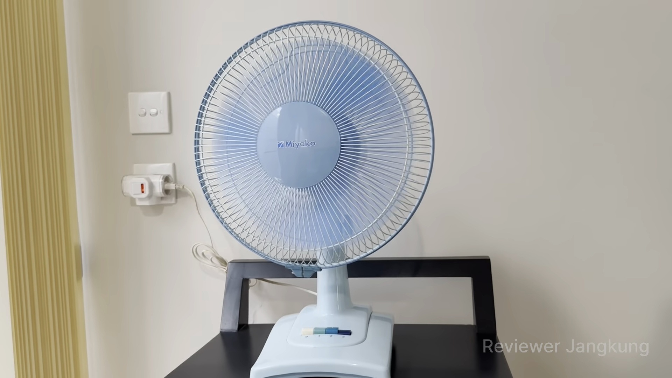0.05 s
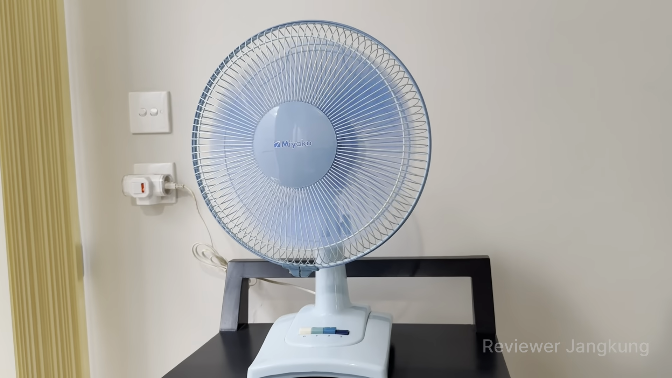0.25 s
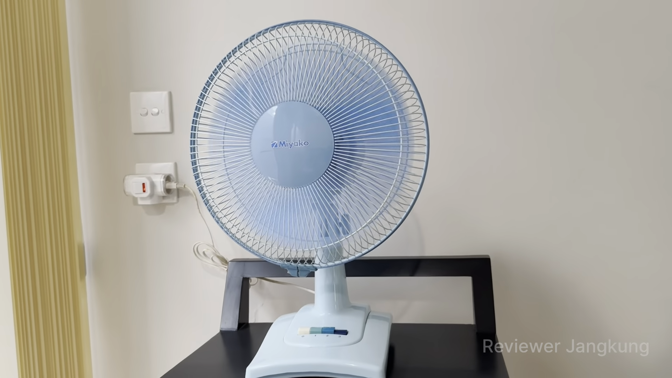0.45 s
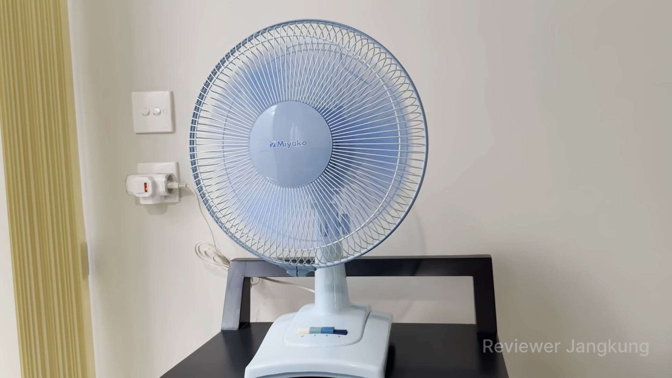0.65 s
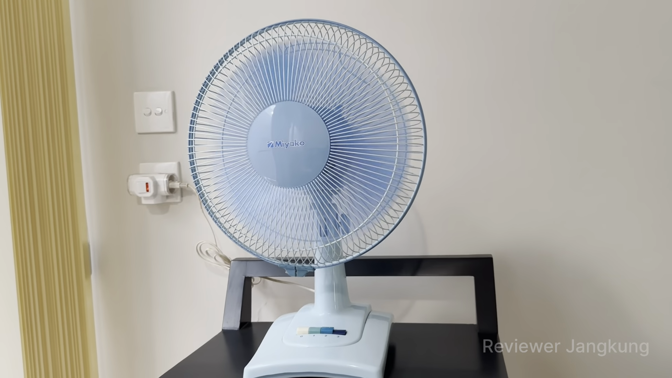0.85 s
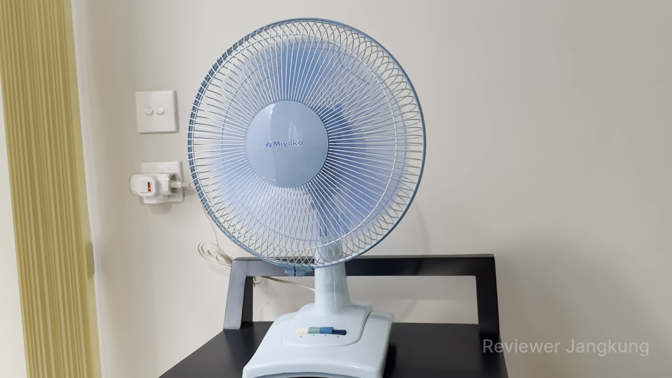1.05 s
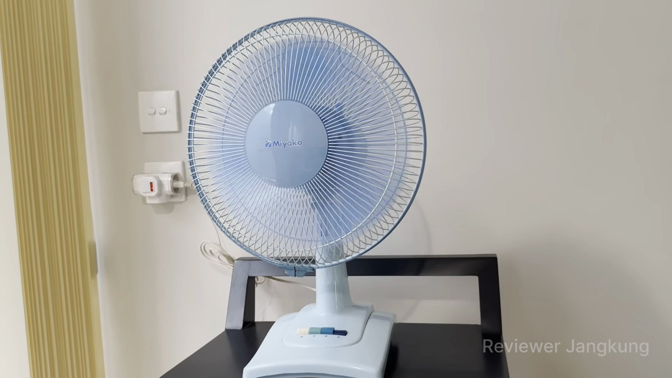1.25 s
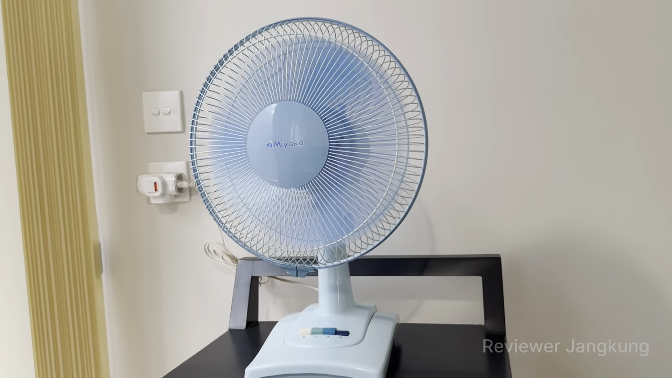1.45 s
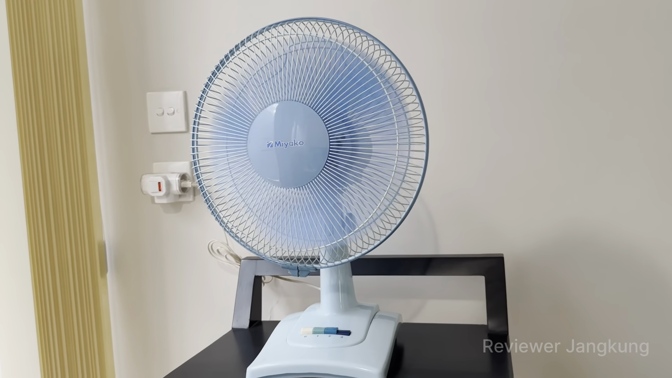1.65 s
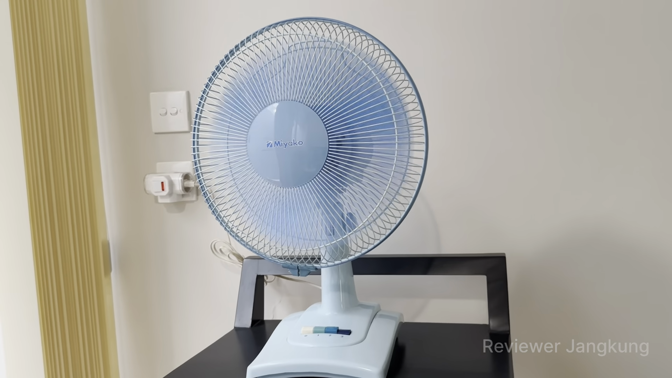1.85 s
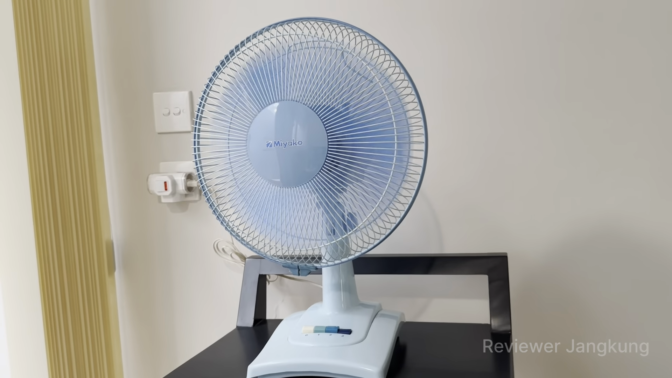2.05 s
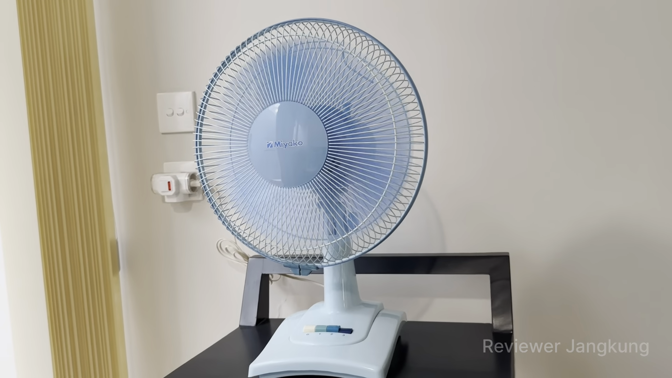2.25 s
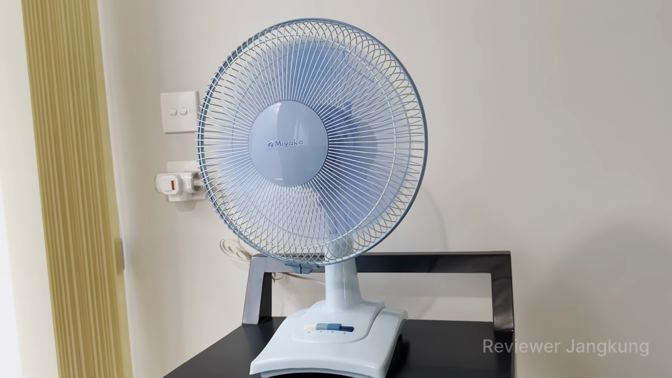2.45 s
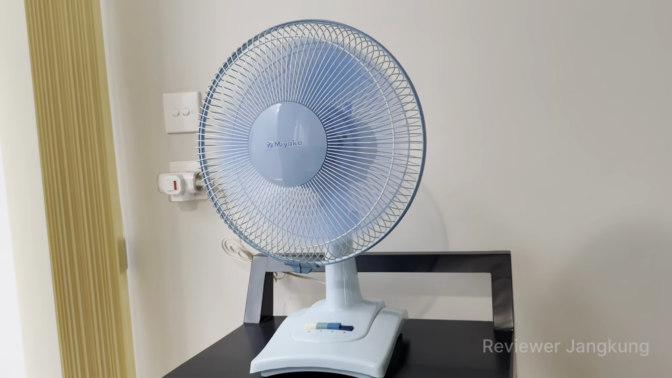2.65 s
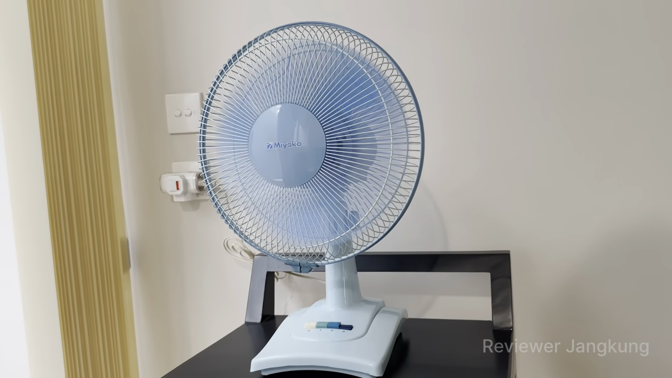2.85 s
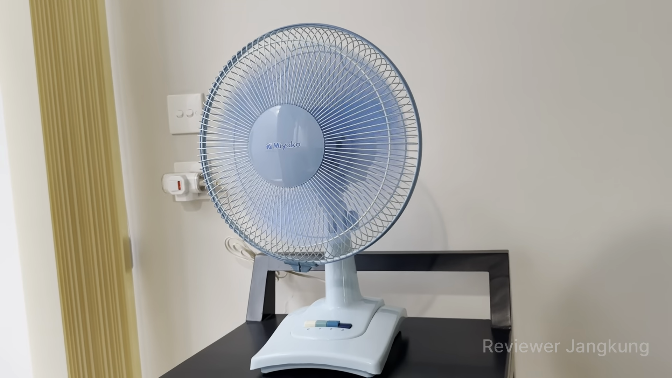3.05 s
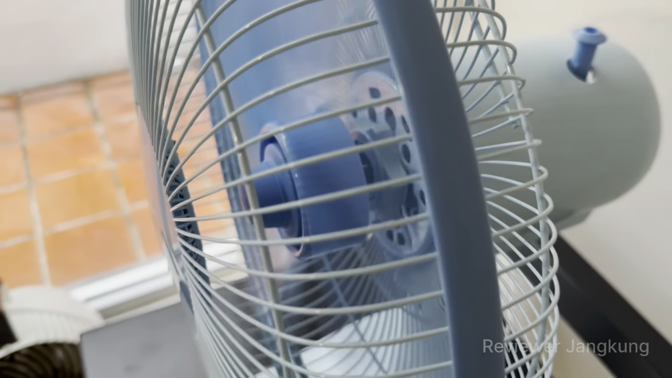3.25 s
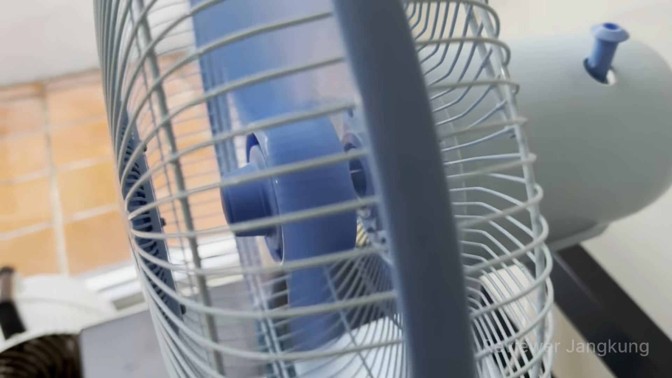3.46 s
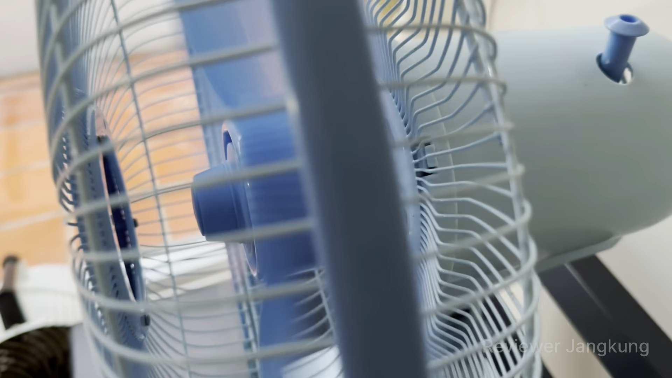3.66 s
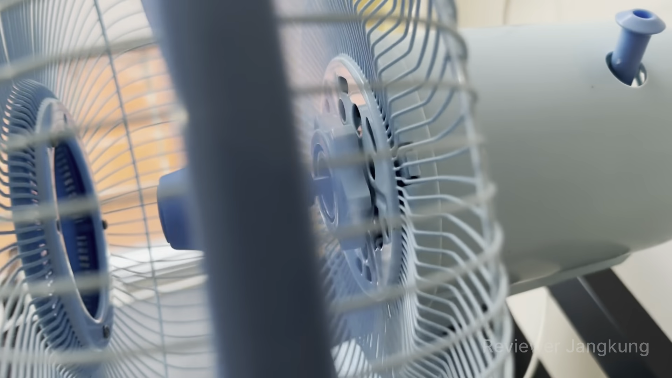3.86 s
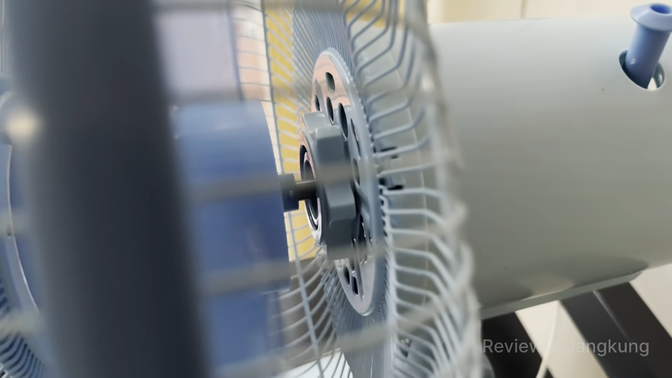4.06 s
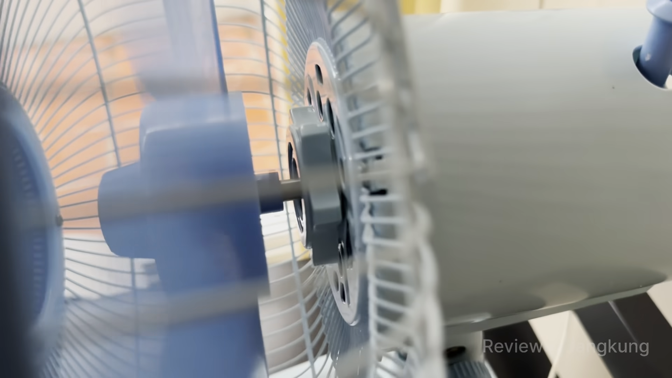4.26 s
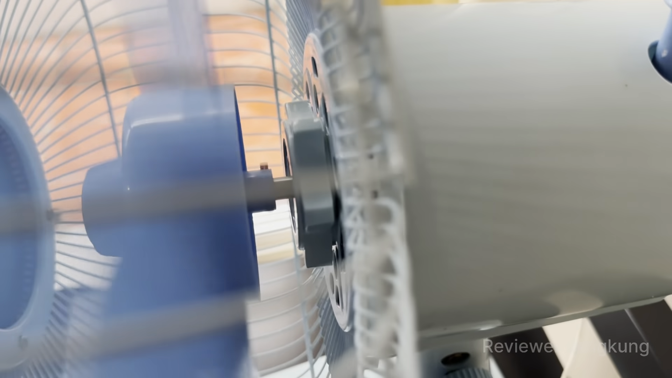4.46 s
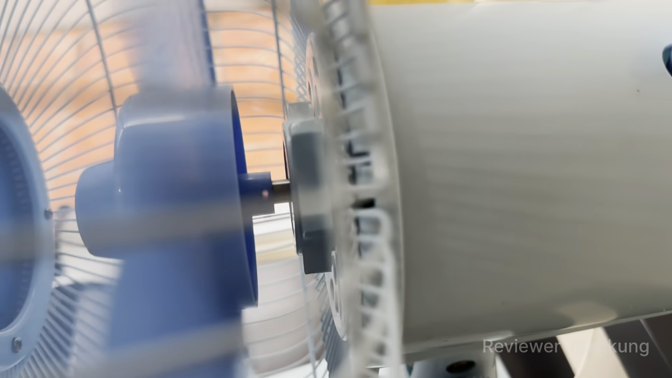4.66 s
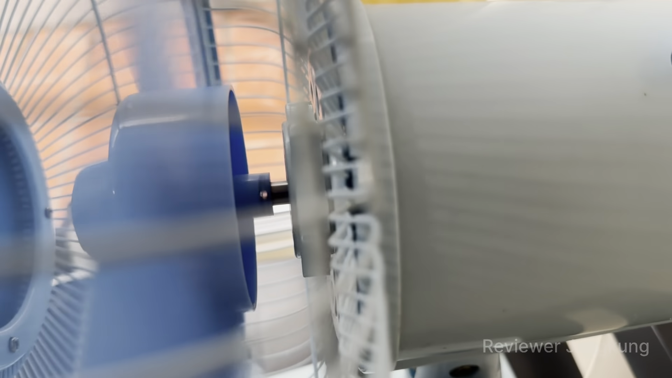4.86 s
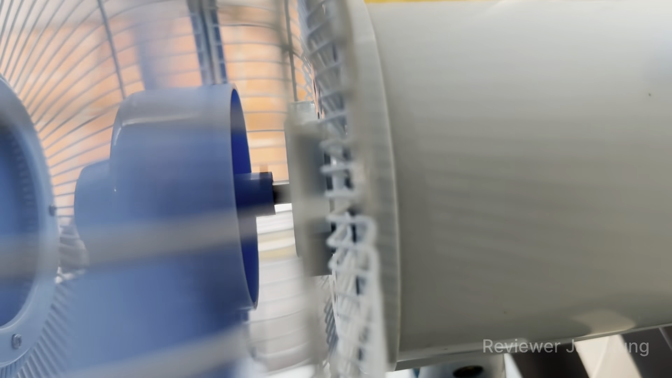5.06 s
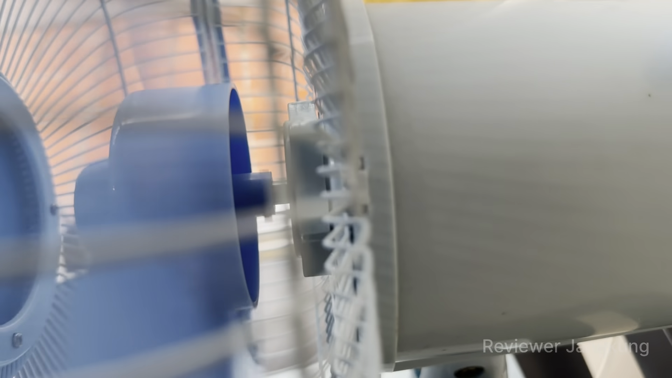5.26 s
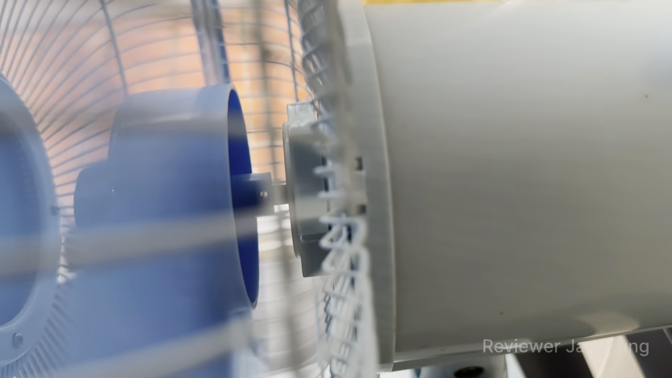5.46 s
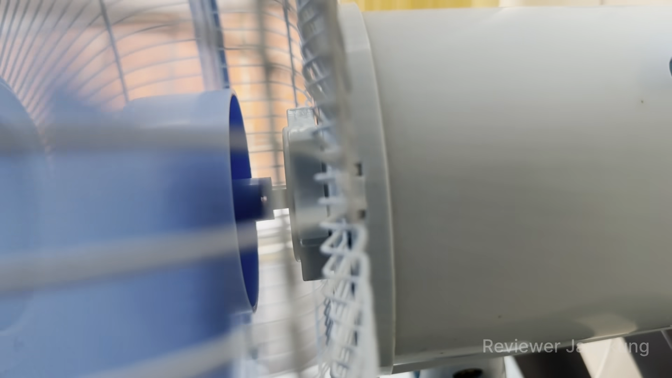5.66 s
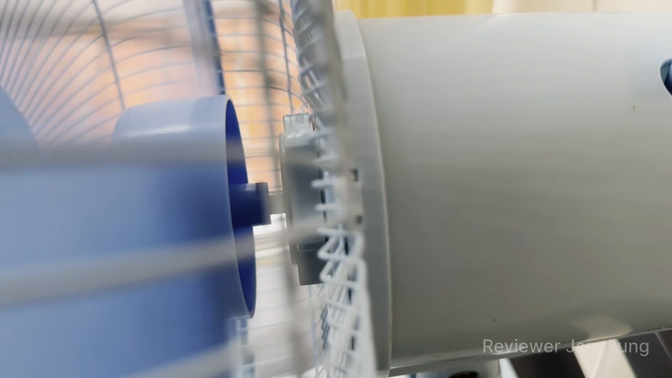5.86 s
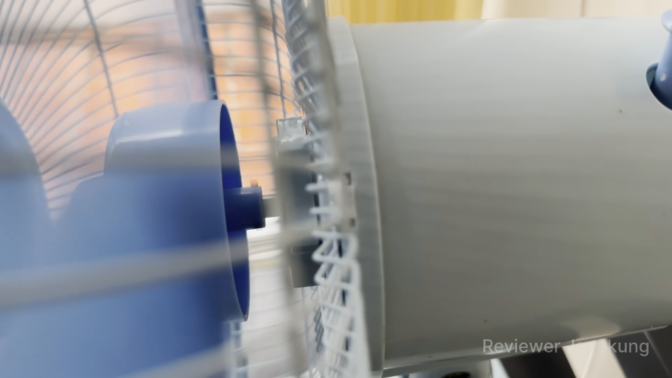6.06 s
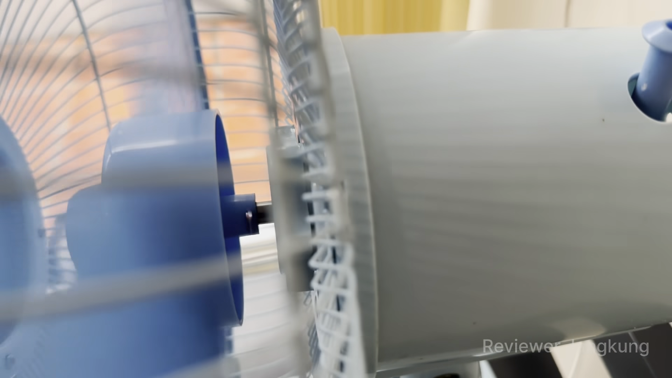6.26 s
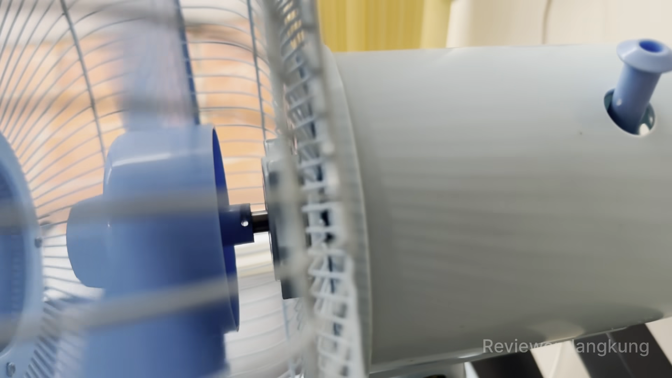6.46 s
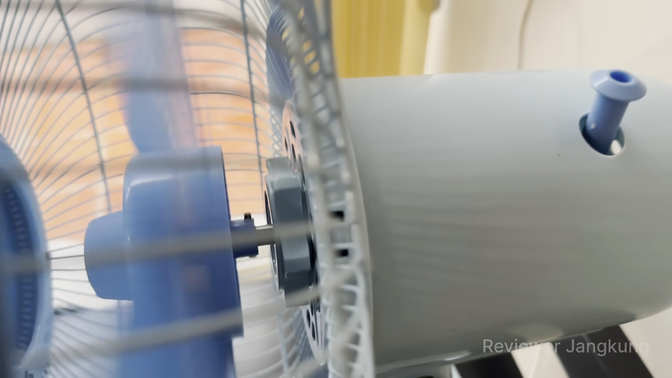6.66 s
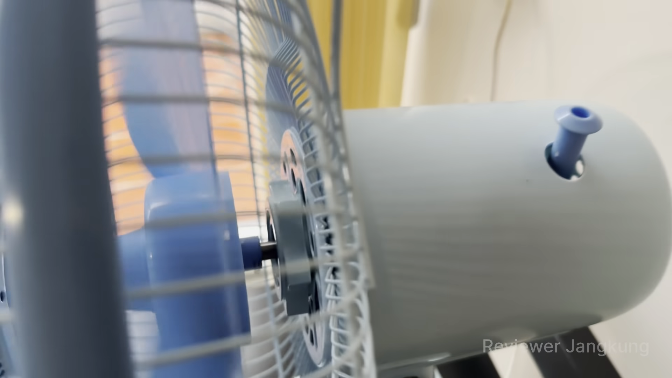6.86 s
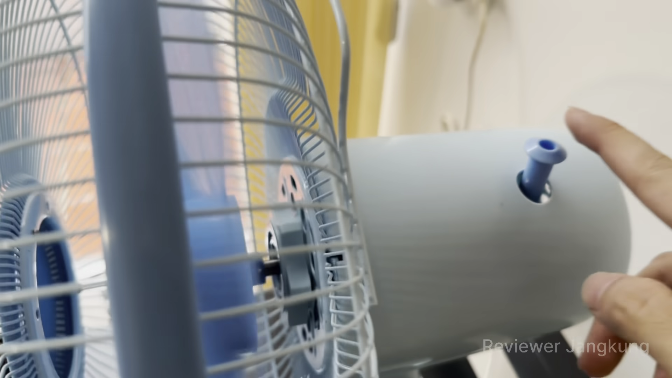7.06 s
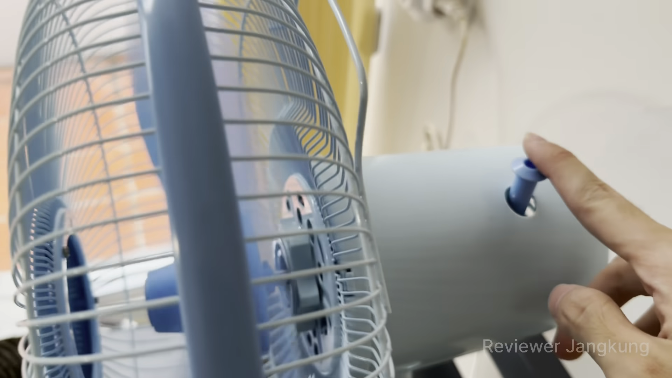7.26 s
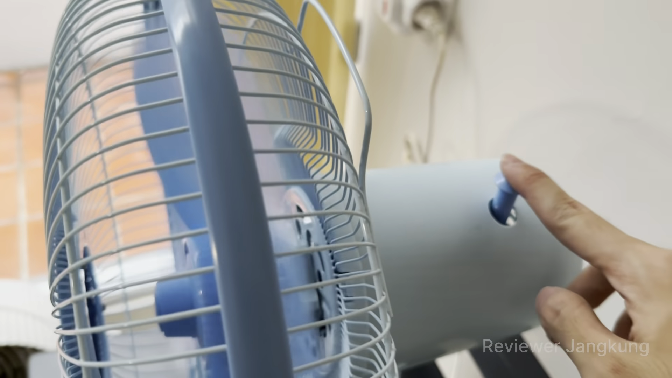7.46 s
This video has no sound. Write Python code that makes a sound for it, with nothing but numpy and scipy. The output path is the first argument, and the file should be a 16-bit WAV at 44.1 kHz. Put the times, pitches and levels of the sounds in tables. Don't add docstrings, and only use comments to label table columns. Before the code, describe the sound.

Desk fan indoors: gusty wind rumbling and popping on the microphone, then a deep 65-hertz blade throb close up, fading with steady airy whir.

```python
import sys
import numpy as np
from scipy import signal
from scipy.fft import rfft, irfft, next_fast_len
from scipy.io import wavfile
from scipy.ndimage import uniform_filter1d

SR = 44100
rng = np.random.default_rng(int(sys.argv[2]) if len(sys.argv) > 2 else 0)


def dump_mix(stems):
    frames = np.atleast_2d(stems).T
    limited = np.clip(frames, -1, 1)
    pcm = np.round(limited * 32767).astype(np.int16)
    wavfile.write(sys.argv[1], SR, pcm)


def nominal_scale(level):
    x = np.asarray(level, float) / 20
    return 10 ** x


N = 331191

FRONT_END_S, SIDE_START_S, BEHIND_START_S = 3.178, 3.174, 6.385

# time in seconds, passes per second.
BLADE_RATE = [(3.2, 65.7), (4.0, 65.7), (4.5, 65.45), (5, 65.3), (6.36, 65.35), (6.42, 65.25), (7.5, 65.18)]

# crest in seconds, rumble level in dB, seconds to die by 20 dB.
GUSTS = [(.066, -21.5, .06), (.108, -17, -0.05), (.18, -31, -0.3), (.225, -28.5, .1), (.31, -27.5, .05),
         (.345, -34.5, 0.5), (.52, -32.5, 0.07), (0.547, -25.5, 0), (0.691, -29.5, -0.1),
         (.803, -13.5, 0.18), (.857, -18, .04), (.92, -18.5, .05), (.965, -21, -0.06), (1.04, -20, 0.1),
         (1.15, -26, .13), (1.285, -26.5, 0.4), (1.345, -23.5, -0.14), (1.405, -19, .13),
         (1.611, -13.5, .08), (1.74, -21.5, 0), (1.822, -16, .09), (1.9, -24, 0), (1.955, -19.5, 0.14),
         (2.095, -18, 0.05), (2.154, -16, 0.08), (2.28, -18.5, 0.07), (2.375, -23.5, .04),
         (2.43, -36, .015), (2.935, -51, -0.7), (3.04, -46.5, -8)]
GUST_RISE_S, GUST_CREST_S = .035, .011
THUD_DB, THUD_HZ = 3.5, 94.5
# frequency in Hz, level in dB per Hz.
RUMBLE_COLOUR = [(30, -29), (55, 1), (80, 3), (130, -3), (200, -7.5), (300, -26), (600, -40), (2000, -92)]
# start in seconds, peak level in dB, brightness in dB per octave, length in seconds.
STRONG_EDDIES = [(.054, -7.5, 7.5, 0.03), (.075, -15, 6, 0.058), (.088, -21, 7, .03),
                 (.135, -21, -2, 0.037), (.165, -23.5, -6, 0.037), (.354, -18.5, -2.2, 0.023),
                 (.781, -16, -4, 0.042), (.798, -17.5, 1, 0.042), (.835, -18.5, -3, 0.055),
                 (.855, -18.5, 10, 0.027), (.882, -13.5, 2.5, 0.049), (1.029, -17.5, 6.5, .041),
                 (1.07, -19.5, -7.5, 0.027), (1.109, -15, -1, 0.034), (1.313, -14.5, -0.5, 0.036),
                 (1.369, -23, -5, 0.039), (1.424, -24.5, 3, 0.098), (1.601, -7, 4.5, 0.042),
                 (1.633, -22.5, 8, 0.037), (1.709, -16, -1.5, 0.037), (1.786, -21.5, -8, 0.044),
                 (1.851, -20, 1, 0.04), (1.868, -21, -2.5, .047), (1.948, -17.5, 0, 0.039),
                 (1.971, -19.5, 4, 0.043), (2.078, -14.5, -2, 0.038), (2.147, -13, 2, 0.043),
                 (2.252, -25.5, -10, 0.03), (2.294, -15, -4.5, 0.042), (2.344, -16, -0.5, 0.043)]
# frequency in Hz, level in dB.
EDDY_COLOUR = [(95, -3), (140, -0.5), (280, -2), (520, -6), (850, -38.5), (1600, -50)]
SMALL_EDDY_DB, SMALL_EDDY_SPREAD_DB, SMALL_EDDY_S = -5.5, 2.5, .029
# start in seconds, peak level in dB, width in seconds.
SNAPS = [(.0535, -6.5, .0014), (0.076, -15, 0.0024), (0.881, -10.5, .0016), (1.317, -19, 0.0026),
         (1.6035, -8, .0017), (1.972, -12, 0.002)]

# frequency in Hz, level in dB per Hz.
FRONT_SWISH = [(250, -40), (440, -11), (750, -4), (930, -9.5), (1150, 0), (1430, -4.5), (1560, -1.5),
               (2270, -12.5), (3000, -14), (6000, -27.5), (9000, -33.5), (11000, -35.5), (13500, -50),
               (15700, -49)]
# frequency in Hz, level in dB per Hz.
RIM_SWISH = [(250, -40), (500, -19), (700, -5), (780, -8.5), (950, -2.5), (1300, -5), (1550, 1),
             (1800, -3.5), (2800, -16.5), (3400, -15), (7500, -29.5), (10700, -33), (12000, -38),
             (15700, -51)]
# frequency in Hz, level in dB per Hz.
HUB_SWISH = [(250, -31), (380, -4.5), (530, -3.5), (1000, -4.5), (1200, 0), (1650, -7), (2000, -8.5),
             (2650, -10), (3000, -15), (3500, -15), (4200, -21.5), (7000, -25), (13800, -42), (15700, -35)]
# frequency in Hz, level in dB per Hz.
BEHIND_SWISH = [(250, -8), (550, -10), (800, -4.5), (1630, -0.5), (1800, -2.5), (2000, 0), (2500, -10),
                (4200, -25.5), (5200, -23), (6000, -26.5), (9500, -40), (11500, -44), (13200, -33),
                (14300, -43)]
SWISH_DB = [-43.5, -39, -38.5]
HUB_GAIN_DB = 3
BEHIND_FOLLOWS = .13

# frequency in Hz, level in dB per Hz.
ROOM_COLOUR = [(30, -28), (50, 1.5), (100, 1), (170, 1.5), (250, 2.5), (330, 2), (420, 1), (600, -32)]
ROOM_FRONT_DB, ROOM_SIDE_DB, ROOM_BEHIND_DB = -56, -47, -52
ROOM_FOLLOWS = .15

# multiple of the blade rate, room level in dB, dB under the near thump.
OVERTONES = [(3, -58, -30), (4, -58, -45.5), (5, -57.5, -48.5)]
SWELLS_PER_S = 2.8
RIM_LIFT_DB = 7.5

# frequency in Hz, width in Hz, level in dB in front, beside and behind.
HUM_TONES = [(300, 1.5, -58, -57, -60), (960, 2.5, -75, -54, -72)]
# frequency in Hz, level in dB.
WHINE_LINES = [(6158, -78), (6487, -77.5), (6616, -77), (6681, -70.5), (7031, -77), (8791, -78.5),
               (8926, -82), (9205, -83), (9534, -84), (9663, -82.5), (11493, -85), (14906, -82)]

# time in seconds, blade thump level in dB,
# sharpness as second harmonic in dB under the thump, share of hub colour from 0 to 1.
SIDE_PATH = [
    (3.2, -39, -14, 0.23),
    (3.4, -35.5, -16, .15),
    (3.6, -31, -11, 0.2),
    (3.95, -22.5, -12, 0.17),
    (4.25, -16.5, -11, 0.42),
    (4.55, -13, -12.5, 0.47),
    (4.9, -12, -13, 0.71),
    (5.9, -12.5, -13.5, 0.63),
    (6.37, -14, -16, 0.25),
]
# time in seconds, thump level in dB, sharpness in dB.
BEHIND_PATH = [
    (6.44, -23, -22),
    (6.69, -25.5, -14.5),
    (7.03, -32.5, -18.5),
    (7.28, -36.5, -9.5),
    (7.45, -38, -15),
]
# shaft multiple, dB under the thump, lag in radians.
UNEVEN_BLADES = [(1, -65.5, 1), (2, -48, -4), (4, -25, -2.5), (5, -25.5, -5.5), (7, -35, -1.5),
                 (8, -44, -4)]

TOP_CUT_HZ = 15780


def at_time(s, values):
    return np.interp(np.arange(N) / SR, s, values)


def in_time(rows):
    s, *columns = np.transpose(rows)
    return [at_time(s, column) for column in columns]


def rms_one(x):
    return x / np.sqrt(np.mean(x ** 2) + 1e-20)


def drift(rate, depth_db=None):
    coarse = 40
    pole = np.exp(-2 * np.pi * rate * coarse / SR)
    noise = rng.standard_normal(N // coarse + 2002)
    slow = signal.lfilter([1], [1, -2 * pole, pole * pole], noise)
    slow = rms_one(slow[2000:])
    if depth_db is not None:
        slow = nominal_scale(depth_db * slow)
    return np.interp(np.arange(N) / coarse, np.arange(len(slow)), slow)


def wander(rate, steady):
    return drift(rate) + 1j * drift(rate) + steady


def coloured(x, points):
    size = next_fast_len(N)
    hz, db = np.transpose(points)
    bin_hz = np.arange(size // 2 + 1) * SR / size
    gain = nominal_scale(np.interp(np.log(bin_hz + 1), np.log(hz), db))
    return irfft(rfft(x, size) * gain, size)[:N]


def band(x, low_hz, high_hz):
    return signal.sosfilt(signal.butter(2, [low_hz, high_hz], "band", fs=SR, output="sos"), x)


def evened(x, hz):
    power = uniform_filter1d(x ** 2, round(1.5 * SR / hz))
    return rms_one(x / (power / np.mean(power) + .15) ** 0.33)


def places():
    front = at_time([FRONT_END_S - .008, FRONT_END_S - .003], [1, 0])
    behind = at_time([BEHIND_START_S - .008, BEHIND_START_S + .011], [0, 1])
    side = at_time([SIDE_START_S, SIDE_START_S + .022], [0, 1]) * (1 - behind)
    return front, side, behind


def shaft_angle():
    passes_per_s, = in_time(BLADE_RATE)
    return 2 * np.pi * np.cumsum(passes_per_s) / (3 * SR)


def stream_db():
    t = np.arange(0, N / SR + .01, .001)
    power = 1e-9
    for s, db, die_s in GUSTS:
        before = (s - GUST_CREST_S - t) / GUST_RISE_S
        after = (t - s - GUST_CREST_S) / max(die_s, .01)
        away = np.maximum(np.maximum(before, after), 0)
        power = power + nominal_scale(db - 2.5 - 20 * away) ** 2
    return at_time(t, 10 * np.log10(power))


def thuds():
    out = np.zeros(N)
    half = SR // 50
    t = np.arange(-half, half) / SR
    for s, db, _ in GUSTS:
        turns = t * THUD_HZ * nominal_scale(0.15 * (db + 21.5))
        at = round((s - .005) * SR) - half
        swing = np.sin(2 * np.pi * turns + 0.87) * np.exp(-2.5 * turns * turns)
        out[at:at + len(t)] += nominal_scale(db + THUD_DB) * swing
    return out


def small_eddies(gust_db, count):
    s = FRONT_END_S * (np.arange(count) + rng.random(count)) / count
    spread_db = SMALL_EDDY_SPREAD_DB * rng.standard_normal(count)
    db = gust_db[(s * SR).astype(int)] + SMALL_EDDY_DB + spread_db
    tilt_db = 3.0 * rng.standard_normal(count)
    return [(a, b, c, SMALL_EDDY_S) for a, b, c in zip(s, db, tilt_db)]


def eddy_bursts(gust_db):
    out = np.zeros(N)
    heard = round(FRONT_END_S * SR)
    after = np.arange(SR // 14) / SR
    white = rng.standard_normal((2, N))[:, :heard]
    eddies = STRONG_EDDIES + small_eddies(gust_db, count=90)
    colour_hz, colour_db = np.transpose(EDDY_COLOUR)
    edges_hz = np.geomspace(80, 2000, 10)
    for k, (low, high) in enumerate(zip(edges_hz, edges_hz[1:])):
        hz = np.sqrt(low * high)
        band_db = np.interp(np.log(hz), np.log(colour_hz), colour_db) - 8
        power = np.zeros(N)
        for s, peak_db, tilt_db, length in eddies:
            db = peak_db + band_db + tilt_db * np.log2(hz / 280)
            x = after / (0.18 * max(length, .01) * (300 / hz) ** 0.67)
            at = max(round((s - .002 + 0.19 / hz) * SR), 0)
            power[at:at + len(x)] += (nominal_scale(db) * x * x * np.exp(1 - x * x)) ** 2
        out[:heard] += np.sqrt(power[:heard]) * evened(band(white[k % 2], low, high), hz)
    return out


def snaps():
    out = np.zeros(N)
    for s, peak_db, width in SNAPS:
        pulse = np.hanning(round(width * SR))
        out[round(s * SR):][:len(pulse)] -= nominal_scale(peak_db) * pulse
    return out


def buffeting():
    gust_db = stream_db()
    rumble = evened(coloured(rng.standard_normal(N), RUMBLE_COLOUR), hz=78)
    out = nominal_scale(gust_db - 3.0 + 2.0 * drift(13.4)) * rumble
    out = out + thuds() + eddy_bursts(gust_db) + snaps()
    soft = signal.sosfilt(signal.butter(2, 2000, fs=SR, output="sos"), out)
    return signal.sosfilt(signal.butter(6, 55, "high", fs=SR, output="sos"), soft)


def echoes(x, wall_db):
    out = x.copy()
    for lag in (rng.uniform(.008, .04, 7) * SR).astype(int):
        out[lag:] += nominal_scale(wall_db) * x[:-lag]
    return out


def swish(points, angle, blade, shaft, flicker_db):
    out = 0
    edges_hz = [200, 900, 2500, 6000, 19000]
    passing = blade * np.cos(3 * angle + 1) + shaft * np.cos(angle)
    for k, (low, high) in enumerate(zip(edges_hz, edges_hz[1:])):
        direct = 0.36 + 0.099 * k ** 2
        throb = 1 + direct * passing
        noise = rng.standard_normal(N) * throb * drift(25, depth_db=flicker_db)
        out = out + band(noise, low, high)
    return rms_one(coloured(echoes(out, wall_db=-23.0), points))


def room_air(front, side, behind, side_db):
    beside = nominal_scale(ROOM_SIDE_DB + ROOM_FOLLOWS * (side_db - side_db.max()))
    level = front * nominal_scale(ROOM_FRONT_DB) + side * beside + behind * nominal_scale(ROOM_BEHIND_DB)
    return level * rms_one(coloured(rng.standard_normal(N), ROOM_COLOUR))


def overtones(angle, near, lift, waver):
    out = 0
    for multiple, room_db, near_db in OVERTONES:
        far = lift * nominal_scale(room_db) * wander(SWELLS_PER_S, 1.31) / 1.53
        close = np.sqrt(2) * near * nominal_scale(near_db) * drift(7.6, depth_db=1.5)
        phase = round(multiple) * (3 * angle + waver * drift(5))
        out = out + np.real((far + close) * np.exp(1j * phase))
    return out


def hum(gains):
    out = 0
    t = np.arange(N) / SR
    for hz, width, *place_db in HUM_TONES:
        level = sum(gain * nominal_scale(db) for gain, db in zip(gains, place_db))
        tone = np.real(wander(width, 1.15) / 2.3 * np.exp(2j * np.pi * hz * t))
        out = out + np.sqrt(2) * level * tone
    return out


def whine():
    out = 0
    t = np.arange(N) / SR
    for hz, db in WHINE_LINES:
        out = out + np.sqrt(2) * nominal_scale(db) * drift(2, depth_db=5.0) * np.sin(2 * np.pi * hz * t)
    return out


def thump(first_db, second_db, angle, lean, wobble_db, gusts_db):
    first, second = nominal_scale(first_db), nominal_scale(first_db + second_db)
    blade = 3 * angle
    sharp = second * drift(5.7, depth_db=4.0 * wobble_db) * np.cos(2 * blade + lean)
    shape = np.cos(blade)
    for multiple, db, lag in UNEVEN_BLADES:
        shape += nominal_scale(db) * drift(1.9, depth_db=1.0) * np.cos(round(multiple) * angle + lag)
    turbulence = rms_one(band(rng.standard_normal(N), 60, 170))
    shed = nominal_scale(gusts_db) * drift(1.9, depth_db=2.0) * turbulence
    pulses = np.sqrt(2) * (sharp + first * shape) * drift(25, depth_db=wobble_db)
    return pulses + first * shed


def scene():
    front, side, behind = gains = places()
    angle = shaft_angle()
    side_db, side_sharp_db, hub = in_time(SIDE_PATH)
    behind_db, behind_sharp_db = in_time(BEHIND_PATH)
    hub = np.clip(hub, 0, 1)

    front_swish = swish(FRONT_SWISH, angle, blade=0.029, shaft=0.035, flicker_db=0.33)
    out = front * (buffeting() + nominal_scale(SWISH_DB[0]) * front_swish)

    rim_swish = swish(RIM_SWISH, angle, blade=0.11, shaft=0.048, flicker_db=0.85)
    hub_swish = swish(HUB_SWISH, angle, blade=0.16, shaft=0.054, flicker_db=0.86)
    side_swish = np.sqrt(1 - hub) * rim_swish + np.sqrt(hub) * hub_swish
    out += side * nominal_scale(SWISH_DB[1] + HUB_GAIN_DB * hub) * side_swish
    out += side * (.15 + .4 * hub) * whine()
    out += side * thump(side_db, side_sharp_db, angle, lean=-0.61, wobble_db=0.21, gusts_db=-31)

    leaving = nominal_scale(SWISH_DB[2] + BEHIND_FOLLOWS * (behind_db - behind_db.max()))
    out += behind * leaving * swish(BEHIND_SWISH, angle, blade=0.071, shaft=.07, flicker_db=0.1)
    out += behind * thump(behind_db, behind_sharp_db, angle, lean=-2.3, wobble_db=0.0, gusts_db=-24.5)

    near = side * nominal_scale(side_db) + behind * nominal_scale(behind_db)
    lift = nominal_scale(RIM_LIFT_DB * side * (1 - hub))
    out += room_air(front, side, behind, side_db)
    out += sum(gains) * overtones(angle, near, lift, waver=0.062)
    out += hum(gains)
    return out[None]


def low_pass(x):
    return signal.sosfilt(signal.butter(12, 15960, fs=SR, output="sos"), x)


def record(dry):
    top_cut = signal.ellip(12, .5, 60, TOP_CUT_HZ, fs=SR, output="sos")
    mix = signal.sosfilt(top_cut, dry)
    return low_pass(mix)


dry = scene()
out = record(dry)
dump_mix(out)
```